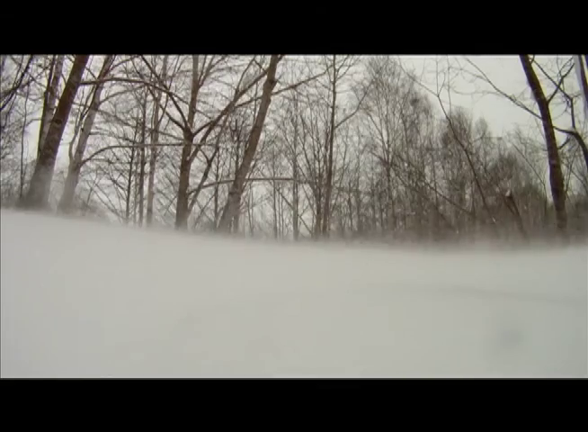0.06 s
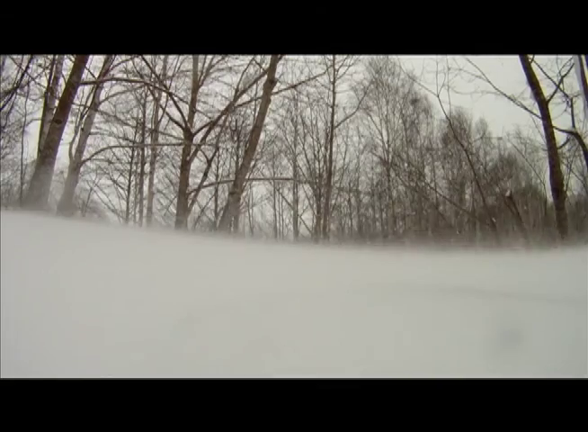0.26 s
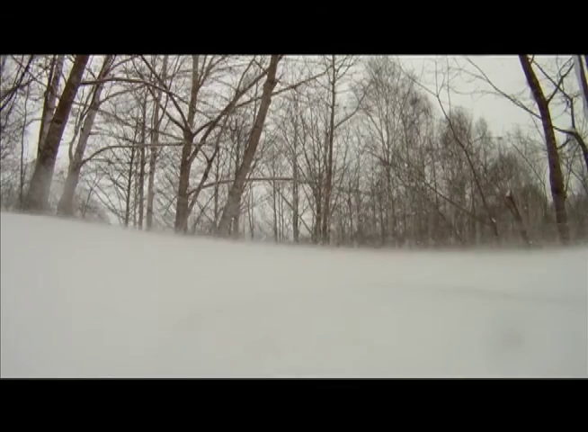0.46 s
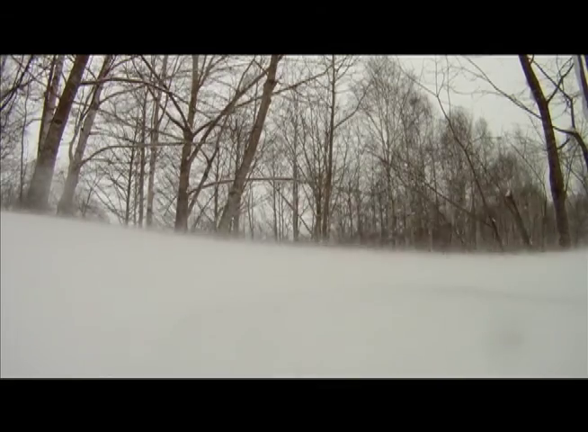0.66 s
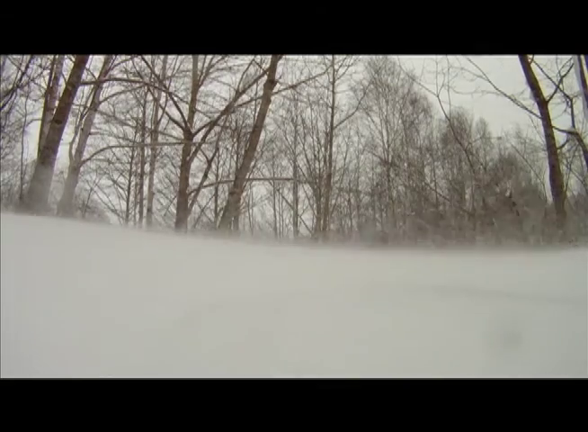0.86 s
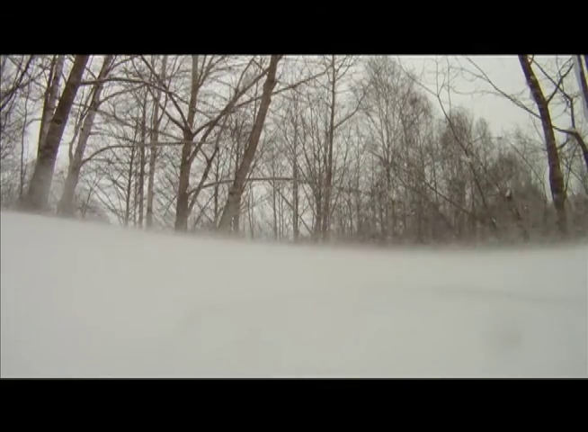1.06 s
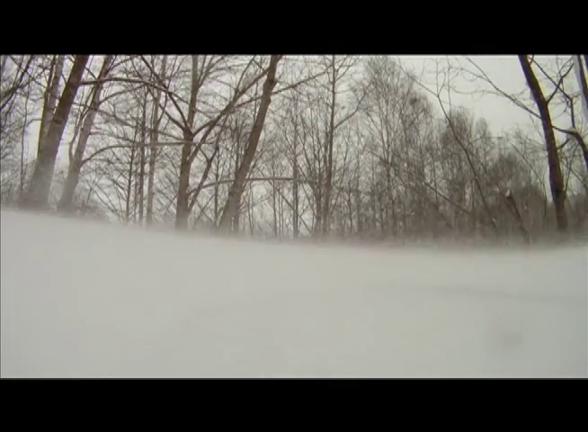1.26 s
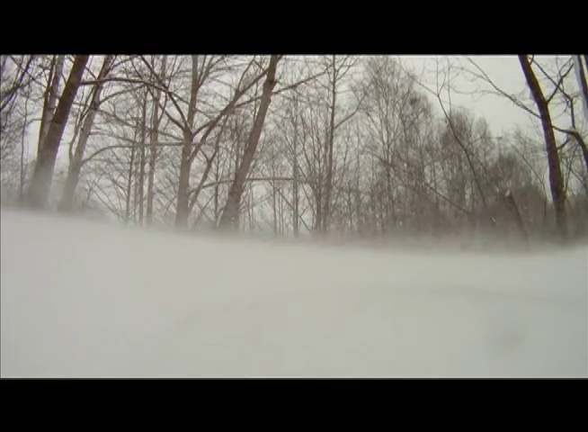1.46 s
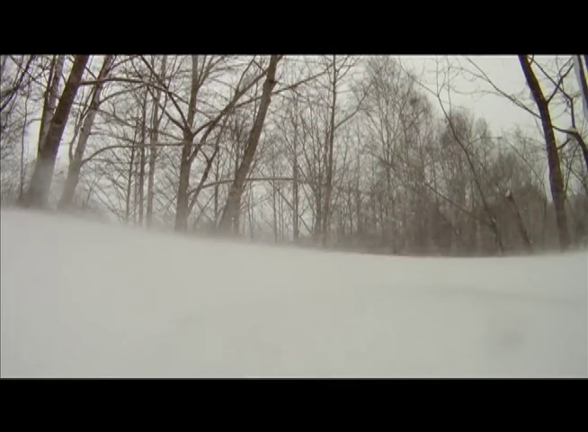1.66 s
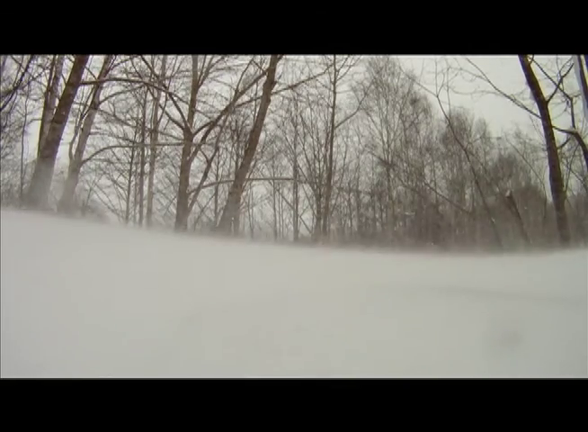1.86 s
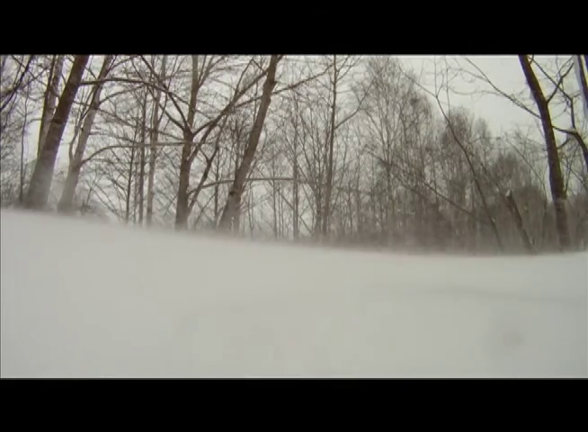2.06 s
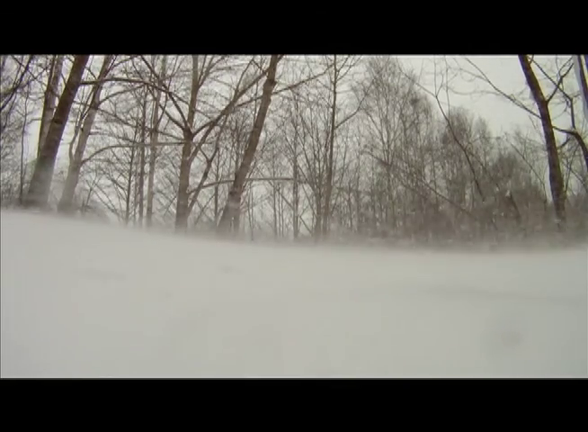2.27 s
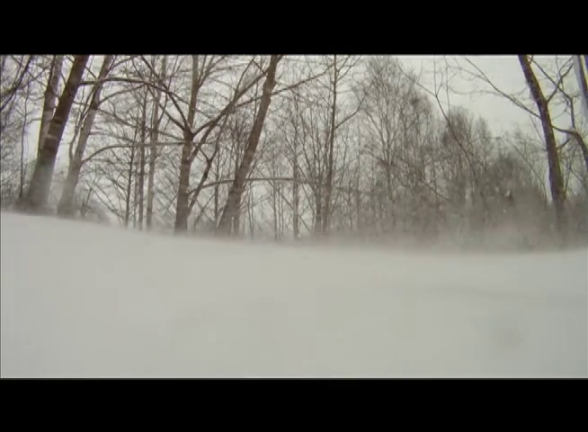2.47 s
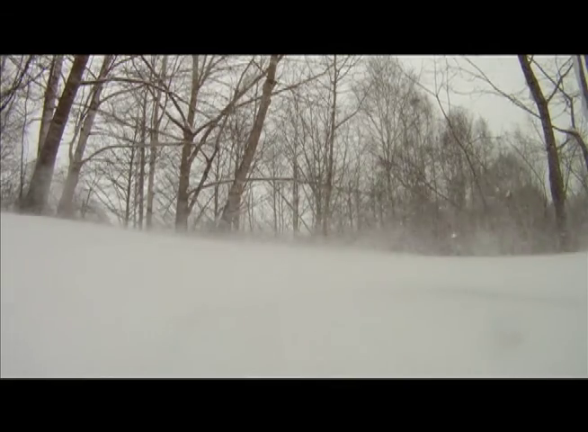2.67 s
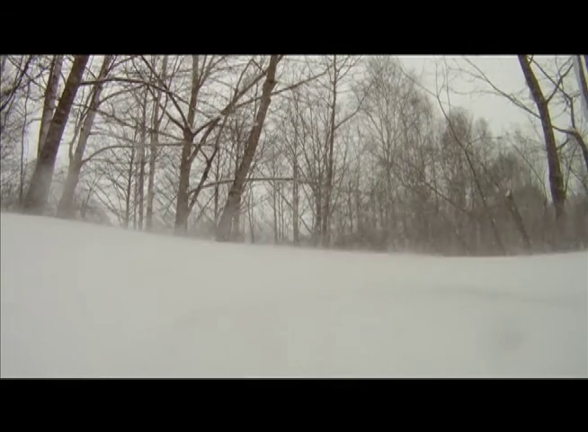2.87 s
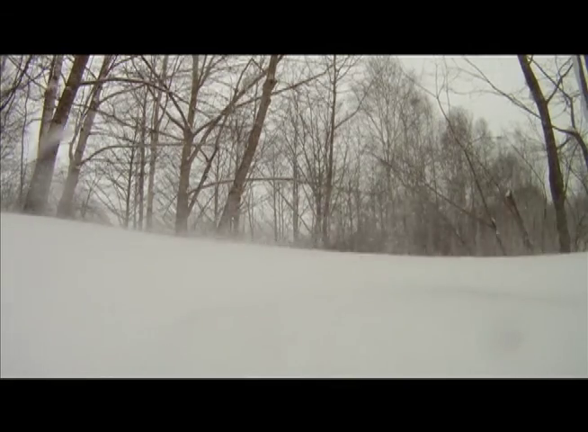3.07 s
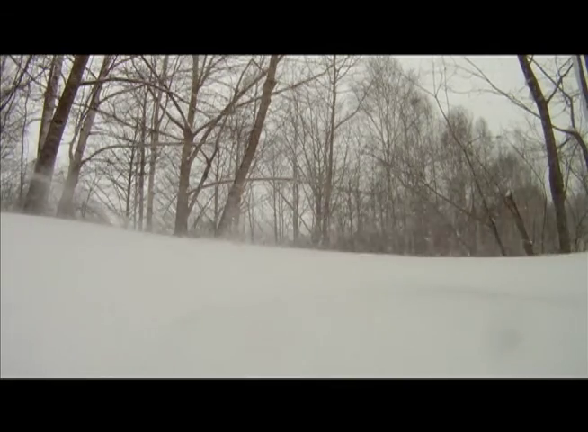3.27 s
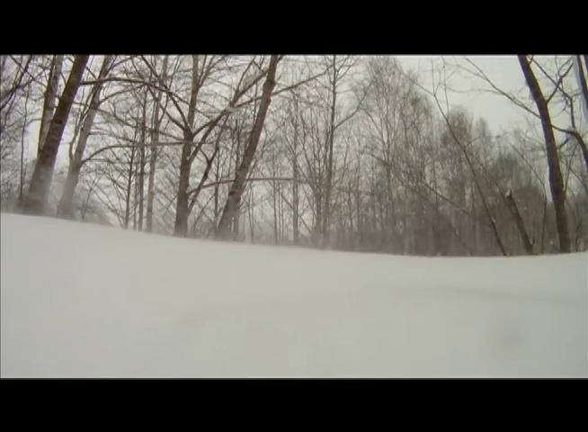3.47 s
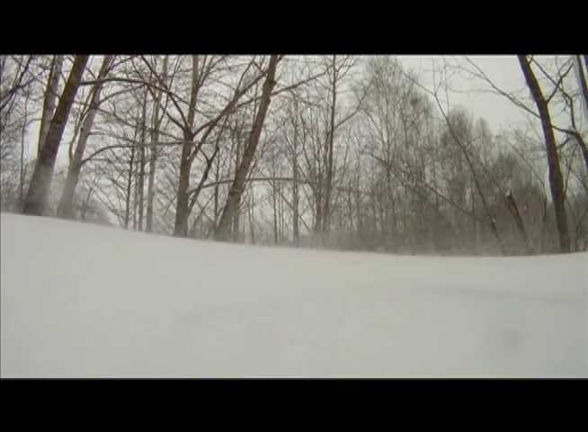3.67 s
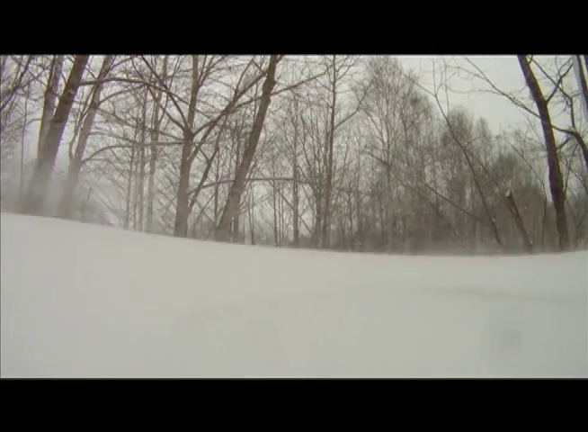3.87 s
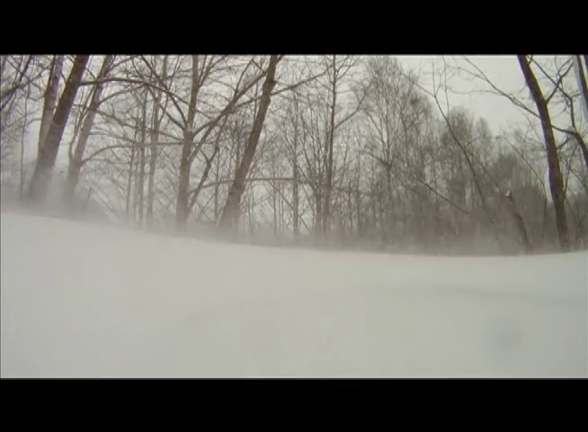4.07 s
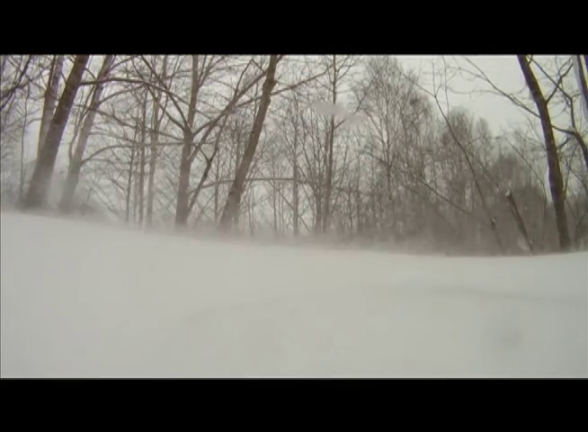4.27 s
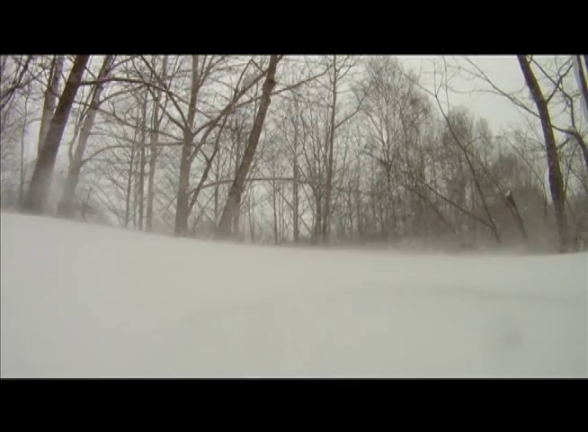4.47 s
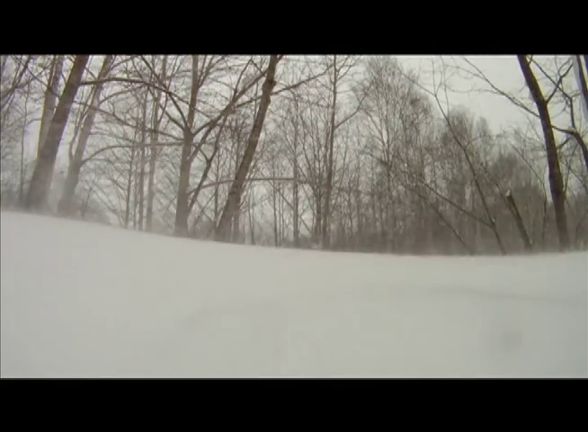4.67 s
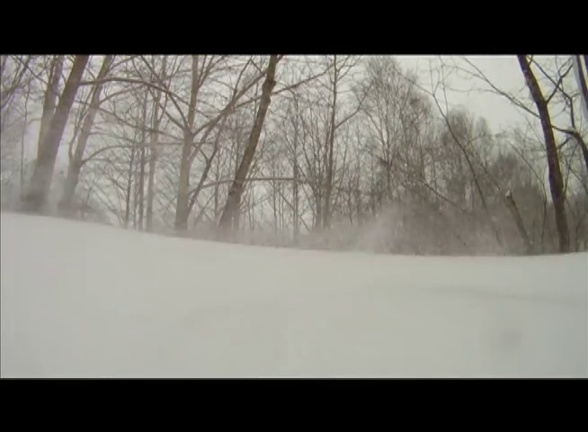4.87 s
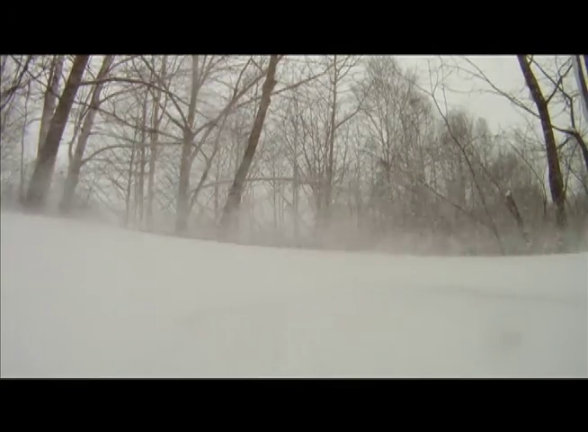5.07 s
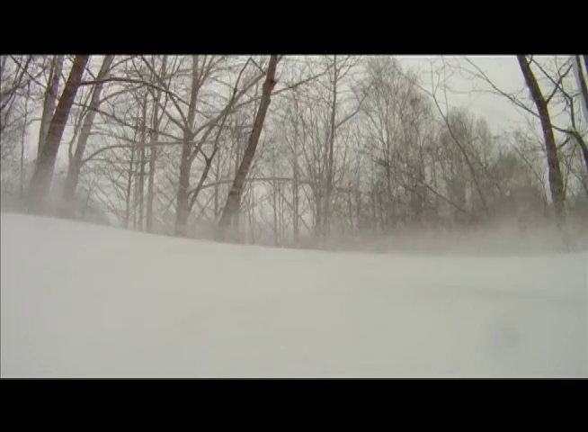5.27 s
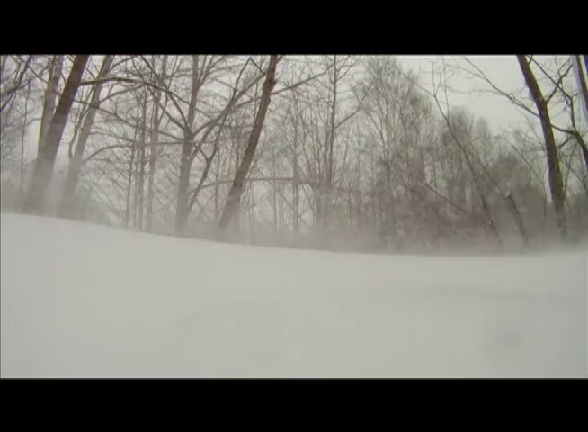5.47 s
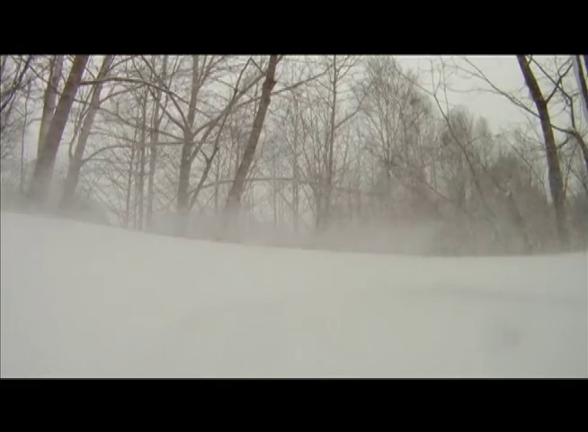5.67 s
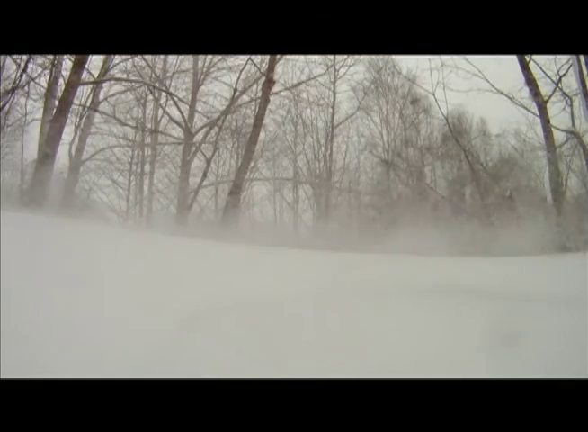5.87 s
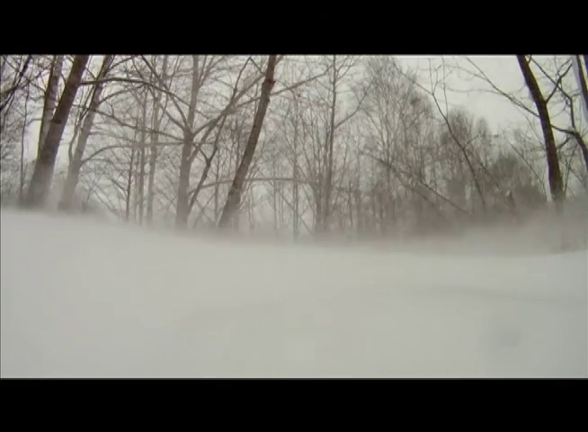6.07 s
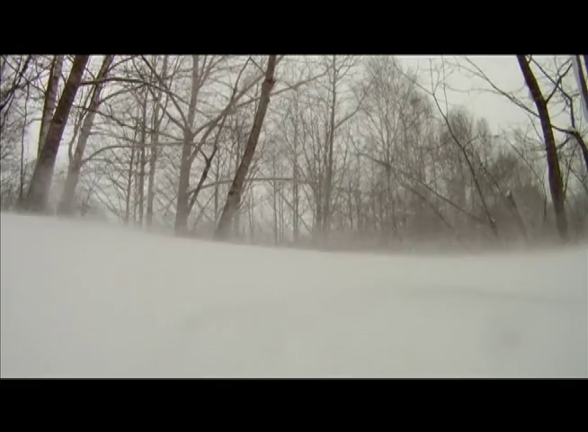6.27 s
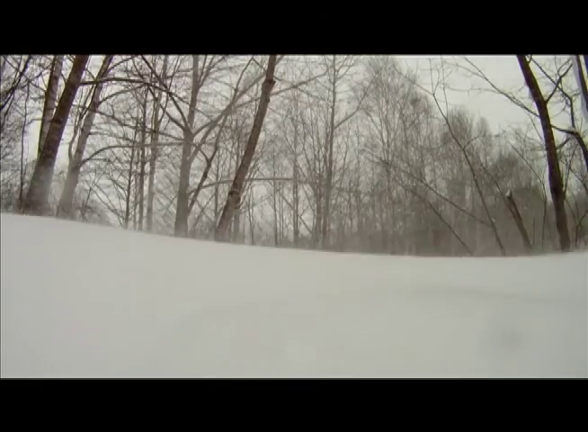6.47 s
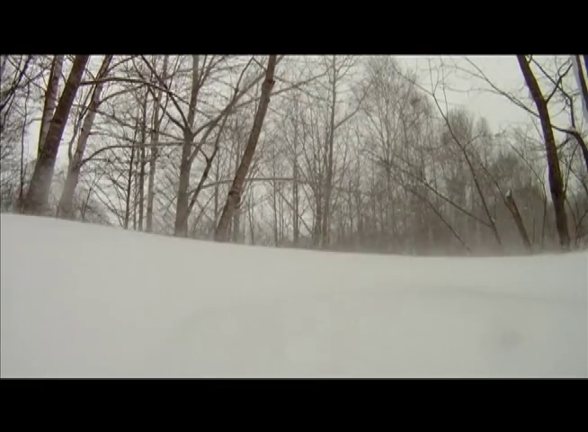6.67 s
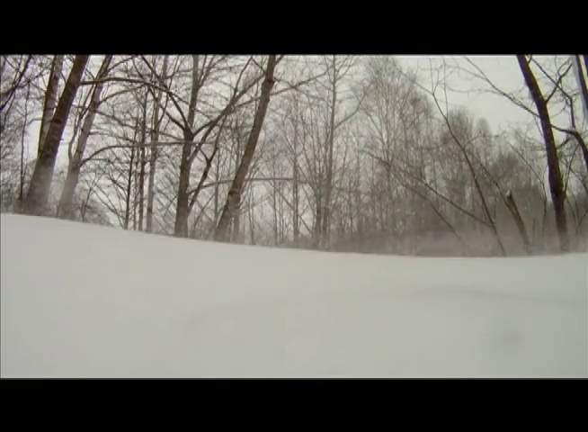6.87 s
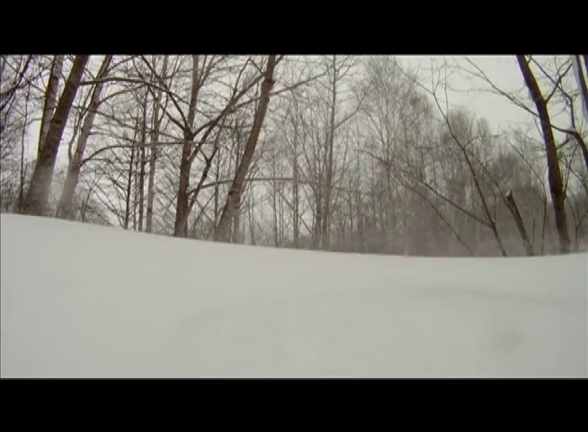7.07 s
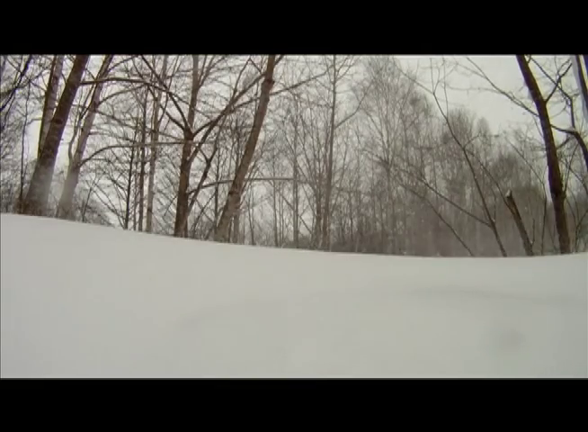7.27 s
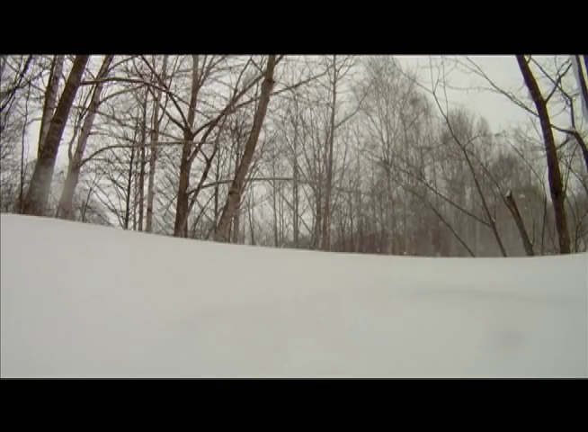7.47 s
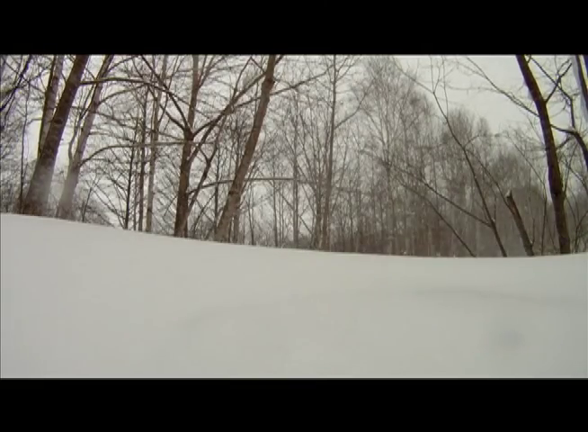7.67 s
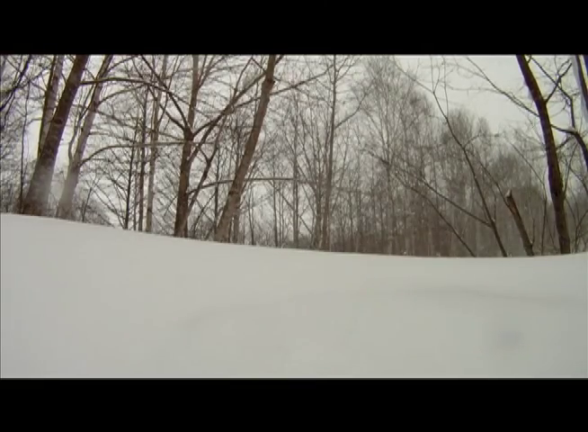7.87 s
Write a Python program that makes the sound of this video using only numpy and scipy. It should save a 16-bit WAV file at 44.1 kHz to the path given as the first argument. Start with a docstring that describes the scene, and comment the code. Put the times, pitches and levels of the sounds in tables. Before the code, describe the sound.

At a snowy forest edge, a microphone low in the snow catches gusting wind, airy in bare trees with low fluttering rumble. Icy grains rattle very close on the casing in dense bursts with sharp ticks, strongest near one second, lively around two and a half, sparse from three to five, then heavy again before six and thinning to near quiet.

```python
"""The edge of a forest in a blizzard, with a camera and its microphone low in the snow.
Gusts rush through the bare trees, a roar runs near the ground and eddies buffet the port: shaped noise.
Close up, icy grains rattle on the housing as random blows through its resonances, with single hard ticks.
A few small pings are pairs of decaying sines; soft lumps and one brief shudder are low sines."""
import sys
import numpy as np
from scipy import signal
from scipy.fft import rfft, irfft, next_fast_len
from scipy.io import wavfile
from scipy.ndimage import uniform_filter1d, map_coordinates

SR = 44100
rng = np.random.default_rng(int(sys.argv[2]) if len(sys.argv) > 2 else 0)


def wav_record(signal):
    """Record a signal, one row per channel, as 16-bit PCM in the file named by sys.argv[1]."""
    frames = np.transpose(np.atleast_2d(signal))
    bounded = np.clip(frames, -1, 1)
    # unit amplitude maps onto the largest positive 16-bit level
    quanta = np.round(bounded * 32767).astype(np.int16)
    wavfile.write(sys.argv[1], SR, quanta)


N = 349713


def amp(db):
    """Amplitude factor of a level in dB."""
    return 10 ** (np.asarray(db) / 20)


def unit(x):
    """x scaled to rms 1."""
    return x / np.sqrt(np.mean(x ** 2) + 1e-20)


def along(points, hz):
    """Values at hz from (frequency, value) points, on a log frequency axis."""
    f, v = np.transpose(points)
    return np.interp(np.log(hz + 1), np.log(f + 1), v)


def curves(rows):
    """One value per sample for each column after the time."""
    s, *cols = np.transpose(rows)
    return [np.interp(np.arange(N) / SR, s, c) for c in cols]


def wobble(rate):
    """A smooth random curve, rate knots a second."""
    knots = rng.standard_normal(int(N * rate / SR) + 4)
    return map_coordinates(knots, [np.arange(N) * rate / SR])


def filtered(x, response):
    """x times a response of frequency."""
    m = next_fast_len(N + SR // 2)
    return irfft(rfft(x, m) * response(np.fft.rfftfreq(m, 1 / SR)), m)[:N]


def add(track, s, sound):
    """Mix a sound into the track at time s."""
    part = track[max(round(s * SR), 0):][:len(sound)]
    part += sound[:len(part)]


# notches of the microphone port: centre_hz [Hz], width_hz [Hz], gain_db [dB]
PORT_NOTCHES = [(6020, 534, -8), (11770, 1140, -32)]


def port(hz):
    """Gain of the narrow duct in front of the microphone."""
    return amp(sum(db * np.exp(-((hz - centre) / width) ** 2) for centre, width, db in PORT_NOTCHES))


def air(spectrum, patchy_db):
    """Turbulent noise of rms 1 with patches of random gain, heard through the port."""
    z = signal.stft(rng.standard_normal(N), nperseg=512)[2]
    # smoothed over frequency, then over time
    field = uniform_filter1d(rng.standard_normal(z.shape), size=6, axis=0)
    field = uniform_filter1d(field, size=14, axis=1)
    noise = signal.istft(z * amp(patchy_db * unit(field)), nperseg=512)[1][:N]
    return unit(filtered(noise, lambda hz: amp(along(spectrum, hz)) * port(hz)))


def swell(s, length):
    """Power of a gust or an eddy as it passes: a bell curve."""
    return np.exp(-(2 * (np.arange(N) / SR - s) / length) ** 2)


# strength of the wind among the trees: time_s [s], level_db [dB, relative]
WIND_STRENGTH = [(0.0, -54), (0.6, -58), (1.1, -57.5), (1.45, -54.5), (1.7, -63), (2.05, -63), (2.4, -52),
                 (2.7, -55.5), (2.92, -70), (3.15, -73), (3.7, -67), (4.2, -64.5), (4.6, -69.5), (5.3, -57),
                 (5.95, -54.5), (6.5, -60.5), (7.1, -61), (7.75, -74)]
# gusts that sweep through the trees: centre_s [s], length_s [s], level_db [dB, relative]
TREE_GUSTS = [(0.19, .1, -54), (1.82, 0.073, -57.5), (3.283, .07, -58.5), (3.505, 0.092, -62),
              (4.906, 0.27, -61.5), (6.277, 0.091, -52), (6.745, 0.12, -55), (6.89, 0.21, -58.5),
              (7.307, 0.15, -60)]
# eddies that roll over the microphone port:
# centre_s [s], length_s [s], rumble_db [dB], slow_flapping_db [dB]
PORT_EDDIES = [(0.1, .28, -53, -38), (0.627, 0.26, -51.5, -38.5), (0.96, 0.16, -47.5, -43),
               (1.203, 0.16, -49, -40), (1.468, 0.097, -46, -42), (1.596, 0.16, -61, -38),
               (1.916, 0.14, -61, -43), (2.215, 0.21, -55.5, -47), (2.39, 0.26, -64, -43.5),
               (3.72, 0.2, -58.5, -45.5), (3.976, .11, -60, -54), (4.91, 0.32, -60, -56.5),
               (5.227, 0.2, -56.5, -48.5), (5.425, 0.12, -51, -54), (5.712, 0.14, -51, -43),
               (6.017, 0.16, -44.5, -38.5), (6.274, 0.44, -49.5, -47), (6.735, 0.18, -44.5, -44.5),
               (7.143, 0.34, -54.5, -45.5)]
# rush in the bare trees, before the port: frequency_hz [Hz], density_db [dB per Hz, relative]
RUSH_SPECTRUM = [(300, -16.5), (700, -14.5), (880, -11.5), (1060, -1.5), (1450, -4), (1850, -0.5),
                 (2130, 5.5), (2750, -11.5), (3500, -8.5), (5000, -27), (9200, -19), (9900, -8.5),
                 (10800, -5), (15500, -20.5)]
# roar near the ground, before the port: frequency_hz [Hz], density_db [dB per Hz, relative]
ROAR_SPECTRUM = [(30, -28), (80, -3.5), (160, 1), (250, -2.5), (370, -4.5), (460, -12.5), (700, -12.5),
                 (1500, -8), (4000, -69.5)]
# slow flapping at the port: frequency_hz [Hz], density_db [dB per Hz, relative]
FLAP_SPECTRUM = [(5, -6), (12, -3.5), (18, 7), (23, 12), (32, -7.5), (45, -9), (90, -52)]
# rumble at the port: frequency_hz [Hz], density_db [dB per Hz, relative]
RUMBLE_SPECTRUM = [(20, -5), (40, 0.5), (65, 4), (95, -1.5), (130, -8.5), (250, -22), (600, -65)]
# faint noise of constant level, before the port: frequency_hz [Hz], density_db [dB per Hz, relative]
STILL_SPECTRUM = [(20, -27), (100, -5), (400, -0.5), (2000, -16.5), (5000, -10.5), (15000, -31)]
# wind level in a moderate breeze, on the scale of WIND_STRENGTH
BREEZE_DB = -60
# dB gained by the ground roar, the rumble and the flapping for each dB of wind over the breeze
ROAR_GROWS, RUMBLE_GROWS, FLAP_GROWS = 0.14, .45, 0.58


def wind(rush_db=-53, roar_db=-66, flap_db=-57, rumble_db=-63, gust_db=7, eddy_roar_db=-10,
         swell_db=2.5, still_db=-68):
    """One wind drives the rush in the trees, the ground roar and the buffeting; gusts and eddies add power."""
    strength = curves(WIND_STRENGTH)[0] - BREEZE_DB
    gusts = np.sqrt(sum(amp(db + gust_db) ** 2 * swell(s, length) for s, length, db in TREE_GUSTS))
    eddy_power = sum(amp(dbs)[:, None] ** 2 * swell(s, length) for s, length, *dbs in PORT_EDDIES)
    eddy_rumble, eddy_flap = np.sqrt(eddy_power)
    # independent noises add as powers
    rush = np.hypot(amp(rush_db + strength), gusts)
    roar = np.hypot(amp(roar_db + ROAR_GROWS * strength), amp(eddy_roar_db) * eddy_rumble)
    rumble = np.hypot(amp(rumble_db + RUMBLE_GROWS * strength), eddy_rumble)
    flap = np.hypot(amp(flap_db + FLAP_GROWS * strength), eddy_flap)
    trees = rush * amp(1.04 * wobble(25)) * air(RUSH_SPECTRUM, patchy_db=2.0)
    ground = roar * amp(swell_db * wobble(14)) * air(ROAR_SPECTRUM, patchy_db=1.0)
    flapping = flap * air(FLAP_SPECTRUM, patchy_db=.3)
    rumbling = rumble * amp(0.84 * wobble(17)) * air(RUMBLE_SPECTRUM, patchy_db=1.5)
    still = amp(still_db) * air(STILL_SPECTRUM, patchy_db=-1.5)
    return trees + ground + flapping + rumbling + still


def clumps(rate, life):
    """A curve of spread 1 that jumps whenever a clump of snow bursts and sinks as it scatters."""
    bursts = (rng.random(N) < rate / SR) * rng.uniform(.5, 1, N)
    decay = np.exp(-1 / (life * SR))
    spray = np.minimum(signal.lfilter([1], [1, -decay], bursts), 1)
    return unit(spray - spray.mean())


# thin drift of snow against the housing: time_s [s], level_db [dB, relative]
SNOW_DRIFT = [(0.0, -54.5), (0.38, -55.5), (0.85, -47), (1.25, -46.5), (1.62, -56), (2.1, -56.5),
              (2.35, -42), (2.8, -50), (3.02, -66), (3.16, -68), (3.35, -56.5), (4.6, -56.5), (4.9, -50),
              (6.0, -53.5), (6.12, -63), (6.45, -68), (6.8, -59.5), (7.6, -77.5)]
# flurries flung at the housing:
# start_s [s], level_db [dB, relative], length_s [s], sag_db [dB lost while it lasts]
SNOW_FLURRIES = [(0.129, -44.5, 0.031, -5), (0.449, -36.5, 0.057, 3), (0.553, -38, .02, 2.5),
                 (0.599, -45, 0.038, -2), (0.798, -39.5, 0.099, -1), (0.93, -25.5, .1, 6),
                 (1.039, -34, 0.14, 1), (1.25, -33, 0.034, 0), (1.376, -34, 0.11, 4),
                 (1.803, -42, 0.028, -0.5), (1.982, -43.5, 0.081, 6), (2.202, -34, 0.068, 3.5),
                 (2.338, -36, 0.35, 1), (2.726, -46.5, 0.13, 1.5), (3.253, -49, 0.066, -3),
                 (3.483, -46, .05, 3), (3.619, -50, 0.031, 0), (3.946, -45, 0.051, 0),
                 (4.134, -51, 0.029, -1), (4.246, -48.5, 0.07, 2.5), (4.383, -48.5, 0.055, 3),
                 (4.827, -43.5, .08, 3.5), (5.046, -48.5, 0.12, 3), (5.275, -42.5, 0.029, -3),
                 (5.328, -27, 0.14, 7), (5.477, -35, .19, -2), (5.744, -41, 0.1, 1.5),
                 (5.833, -29, 0.016, 1.5), (5.909, -28, .1, 0.5), (6.022, -34, 0.063, 4),
                 (6.72, -54, 0.046, 3)]
# every flurry builds up and dies away at the same pace
FLURRY_RISE_S, FLURRY_FALL_S = .012, .016


def drift(puff_db=2.5):
    """Relative level in dB of the snow that hits the housing: a puffy drift and the flurries."""
    t = np.arange(N) / SR
    power = amp(curves(SNOW_DRIFT)[0] + puff_db * clumps(rate=32, life=0.016)) ** 2
    for s, db, length, sag_db in SNOW_FLURRIES:
        age = t - s
        before = np.minimum(age, 0)
        after = np.maximum(age - length, 0)
        edges = np.exp(before / FLURRY_RISE_S - after / FLURRY_FALL_S)
        power += (amp(db - sag_db * np.clip(age / length, 0, 1)) * edges) ** 2
    return 10 * np.log10(power)


# resonances of the housing, before the spread from spot to spot:
# centre_hz [Hz], width_hz [Hz], level_db [dB, relative]
HOUSING_MODES = [(1114, 650, -14.5), (2140, 310, -0.5), (2364, 150, 2), (3170, 86, -5), (3660, 380, -3.5),
                 (4730, 210, -13), (5205, 610, -9.5), (6740, 790, -11.5), (8380, 385, -10.5),
                 (9724, 180, -8), (14400, 220, -11)]


def knock(spread_db, tilt_db, low_hz=1300, bright_hz=7000, lag_hz=3600, lag_width_hz=2600,
          echo_s=0.000812):
    """The housing's answer to one grain, energy 1: the spot sets the modes, hardness a tilt per octave."""
    size = 2048
    hz = np.fft.rfftfreq(size, 1 / SR) + 1
    power = 0
    for centre, width, db in HOUSING_MODES:
        strength = amp(db + spread_db * rng.standard_normal()) ** 2
        detuning = (hz * hz - centre * centre) / (hz * width)
        power = power + strength / (1 + detuning ** 2)
    stiff = 1 / np.hypot(1, (low_hz / hz) ** 2)  # the small shell radiates little bass
    tilt = amp(tilt_db * np.log2(np.clip(hz, low_hz, bright_hz) / low_hz))
    gain = np.sqrt(power) * stiff * port(hz) * tilt
    # minimum phase: a sharp start, then the ring
    cepstrum = irfft(np.log(gain + 1e-6))[:size // 2]
    cepstrum[0] /= 2
    response = np.exp(rfft(2 * cepstrum, size))
    # bending waves disperse, so the ring builds up over a cycle or two
    bend = lag_hz ** 2 - hz ** 2 + 1j * hz * lag_width_hz
    # the wave comes back from the far edge, sooner or later according to the spot
    delay = echo_s * (.5 + rng.random())
    edge = 1 + .3 * np.exp(-2j * np.pi * hz * delay)
    ring = irfft(response * edge * np.conj(bend) / bend)[:size // 2]
    return ring / np.linalg.norm(ring)


def flurries(level, snow_db=-0.83, clump_db=1.4, swirl_db=2.1, size_db=7, hardness_db=0.5,
             density=2200, thickening=.75, count=24):
    """Grains land in swirls and clumps on many spots; a thicker drift brings more and louder grains."""
    level = level + clump_db * clumps(rate=120, life=0.0054) + swirl_db * wobble(110)
    # of a landing, per sample; density is grains a second at a level of -40.5 dB
    chance = np.clip(density * amp(thickening * (level + 40.5)) / SR, 1e-6, 1)
    sizes = unit(amp(size_db * np.minimum(rng.standard_normal(N), 1.6)))
    landings = rng.random(N) < chance
    blows = landings * sizes * amp(level + snow_db) / np.sqrt(chance)
    spots = rng.integers(count, size=N)
    track = np.zeros(N)
    for spot, hardness in enumerate(np.linspace(-1, 1, count)):
        ring = knock(spread_db=2.5, tilt_db=hardness_db * hardness)
        track += signal.oaconvolve(blows * (spots == spot), ring)[:N]
    return track


def strays(level, over_db, top_db, spread_db, count):
    """(s, dB) of single grains that land at random all along, the louder the thicker the snow."""
    at = ((np.arange(count) + rng.random(count)) * N / count).astype(int)
    loudness = level[at] + over_db + spread_db * rng.standard_normal(count)
    return zip(at / SR, np.minimum(loudness, top_db))


# the largest ice grains: start_s [s], level_db [dB, relative], hardness_db [dB per octave]
LARGE_GRAINS = [(0.165, -30, -1), (0.3457, -34.5, 1), (0.438, -33.5, 0), (0.512, -30, -5.5),
                (0.5472, -31.5, -1), (0.6686, -28, 1), (0.9184, -13, 2.5), (1.1413, -24.5, -.5),
                (1.186, -30, 0), (1.3745, -25, 0), (1.3929, -24.5, 2), (1.4262, -23.5, 0.5),
                (1.7094, -33, -5), (2.126, -35, -4), (2.2543, -23, 0), (2.343, -20, -2),
                (2.396, -28.5, -1.5), (2.6728, -24, -4.5), (2.814, -36.5, -7), (3.079, -45.5, -2),
                (3.784, -39.5, -6.5), (3.9949, -32, 1), (4.116, -43.5, -3), (4.3956, -40, 1),
                (5.16, -33, 0), (5.3295, -19, 0.5), (5.358, -20.5, -2), (5.4285, -27.5, 1.5),
                (5.577, -30, 0), (5.844, -21, -10), (5.8738, -24, -0.5), (5.9043, -23.5, 0),
                (5.9288, -21.5, 0), (6.0083, -22, 1), (6.182, -40.5, -1), (6.515, -28, 0.5),
                (6.6077, -37, 1), (6.865, -39.5, -4), (6.957, -36, -4), (7.257, -42.5, -1),
                (7.3053, -41.5, 1.5), (7.8505, -44.5, -0.5)]


def ticks(level, tick_db=19.0, splinter_db=-11, splinter_t60=0.075, splinter_rate=700,
          stray_tilt_db=-1, tilt_spread_db=3):
    """Large grains stand out of the rattle, each with its own colour, and break into a spray of splinters."""
    track, t = np.zeros(N), np.arange(SR // 20) / SR
    lesser = [(s, db, rng.normal(stray_tilt_db, tilt_spread_db))
              for s, db in strays(level, over_db=9.0, top_db=-31.5, spread_db=2.5, count=80)]
    for s, db, hardness in [*LARGE_GRAINS, *lesser]:
        ring = knock(spread_db=5.5, tilt_db=hardness, low_hz=1730)
        splinters = (rng.random(len(t)) < splinter_rate / SR) * (2 * rng.random(len(t)) - 1)
        blows = splinters * amp(splinter_db - 60 * t / splinter_t60)
        blows[0] = 1  # the grain itself
        add(track, s, amp(db + tick_db) * signal.fftconvolve(blows, ring))
    return track


# grains that strike a small ringing part of the camera: start_s [s], level_db [dB, relative]
PING_STRIKES = [(0.168, -41), (0.229, -31.5), (0.3455, -26.5), (0.555, -29.5), (0.738, -28.5), (1.168, -26),
                (2.571, -40), (2.761, -24), (4.17, -34), (4.842, -29.5), (4.957, -34), (6.991, -41)]
# modes of that part: pitch_hz [Hz], level_db [dB, before a random spread], t60_s [s]
RINGING_PART = [(3564, 0, 0.037), (8410, -7.5, 0.038)]


def pings(level, ping_db=-1, attack=0.0014):
    """Now and then a grain sets two clear modes ringing for a moment; faint pings follow the drift."""
    track, t = np.zeros(N), np.arange(SR // 10) / SR
    faint = strays(level, over_db=8.0, top_db=-35, spread_db=3.0, count=85)
    for s, db in [*PING_STRIKES, *faint]:
        ring = np.zeros(len(t))
        for hz, mode_db, t60 in RINGING_PART:
            decay = amp(mode_db + rng.normal(0, 1) - 60 * t / t60)
            ring += decay * np.sin(2 * np.pi * hz * t)
        add(track, s, amp(db + ping_db) * ring * (1 - np.exp(-t / attack)))
    return track


def throb(s=2.217, hz=80, db=-44, width=0.032):
    """The camera shudders for a few cycles: a low sine under a bell curve."""
    t = np.arange(N) / SR - s
    return amp(db) * np.exp(-(t / width) ** 2) * np.sin(2 * np.pi * hz * t)


# soft lumps of snow on the housing:
# start_s [s], level_db [dB, before the rise and decay], pitch_hz [Hz]
SNOW_LUMPS = [(2.814, -34.5, 1290), (5.845, -27, 1033)]


def lumps(t60=0.024, attack=0.00072):
    """A soft lump wakes a low ring of the housing: a sine with a rounded start and a quick decay."""
    track, t = np.zeros(N), np.arange(SR // 20) / SR
    for s, db, hz in SNOW_LUMPS:
        decay = amp(db - 60 * t / t60)
        add(track, s, decay * np.sin(2 * np.pi * hz * t) * (1 - np.exp(-t / attack)))
    return track


def scene():
    """Wind and snow at one microphone."""
    snow = drift()
    return (wind() + flurries(snow) + ticks(snow) + pings(snow) + throb() + lumps())[None]


def record(dry, top_hz=15500):
    """The camera keeps nothing above its band limit."""
    return np.array([filtered(channel, lambda hz: hz < top_hz) for channel in dry])


dry = scene()
out = record(dry)
wav_record(out)
```